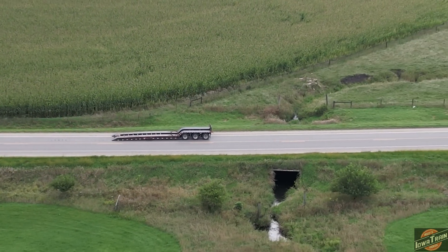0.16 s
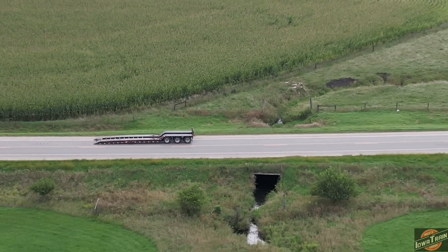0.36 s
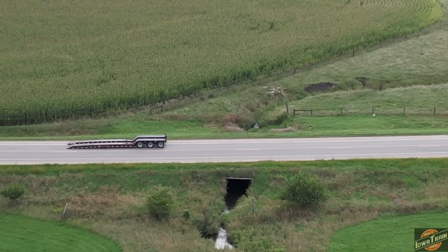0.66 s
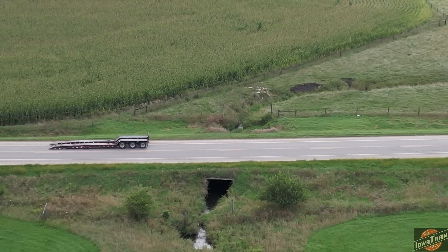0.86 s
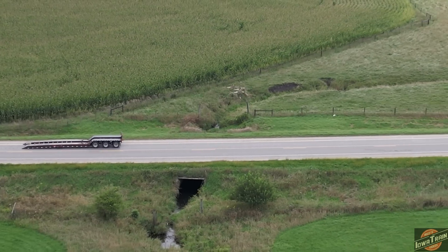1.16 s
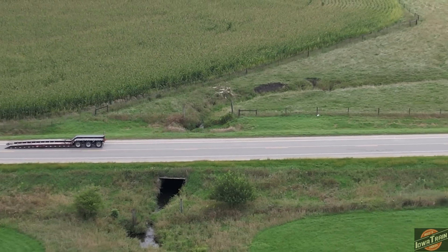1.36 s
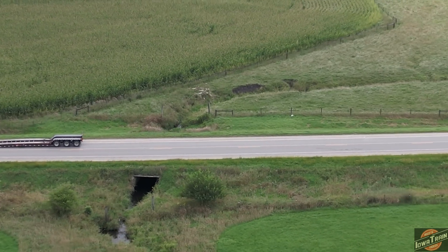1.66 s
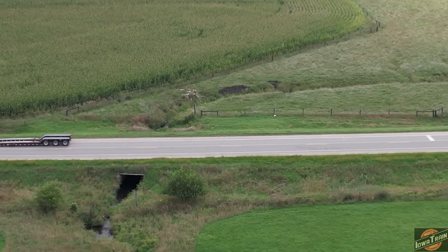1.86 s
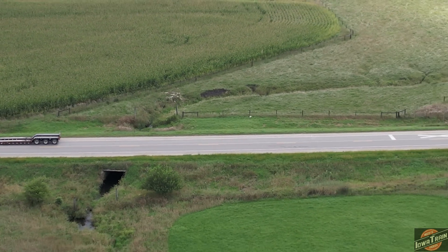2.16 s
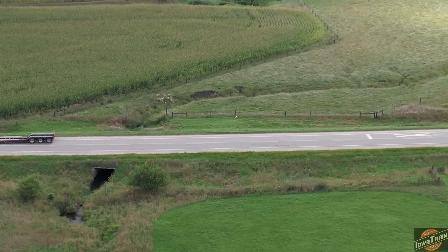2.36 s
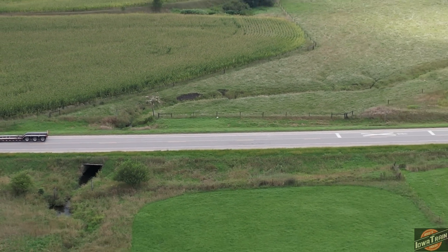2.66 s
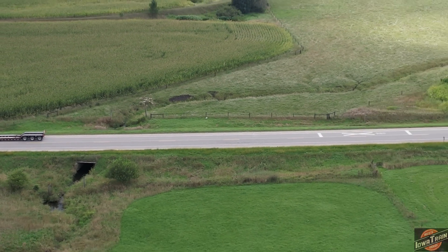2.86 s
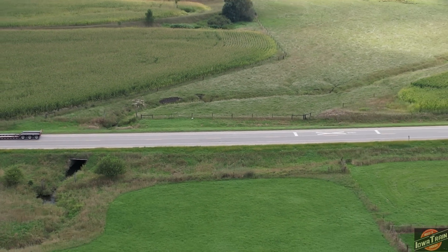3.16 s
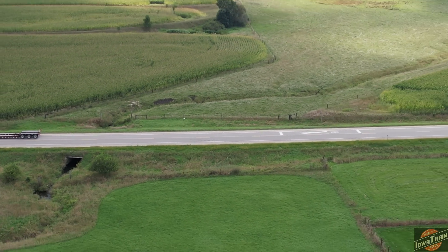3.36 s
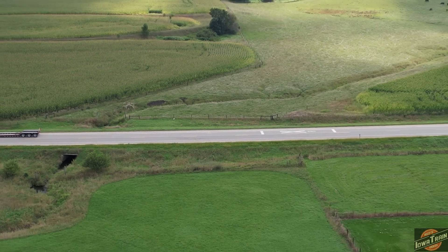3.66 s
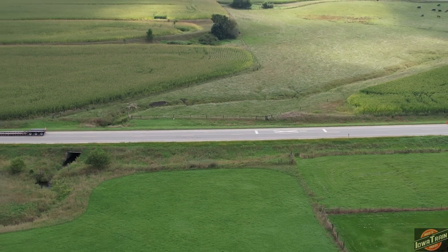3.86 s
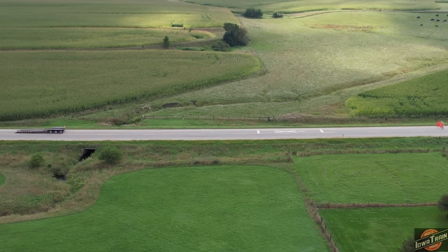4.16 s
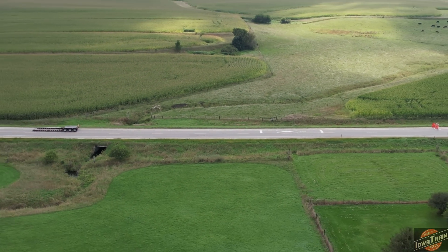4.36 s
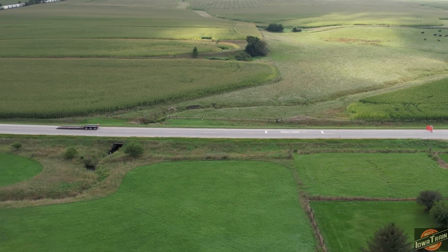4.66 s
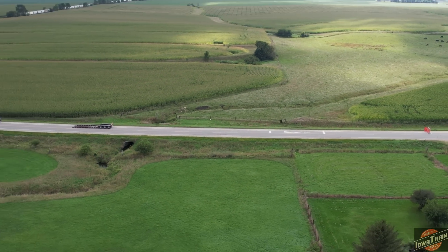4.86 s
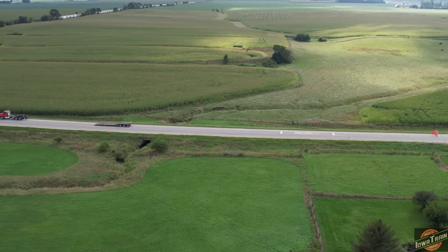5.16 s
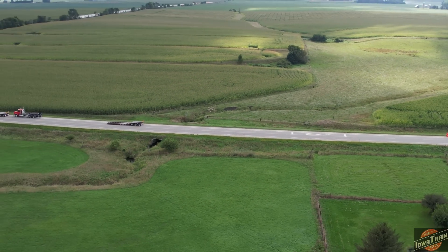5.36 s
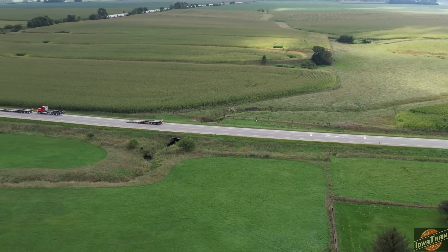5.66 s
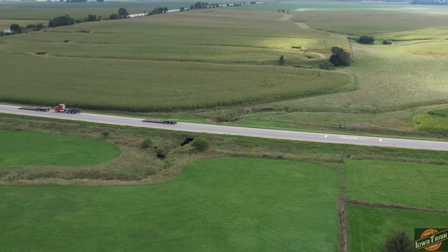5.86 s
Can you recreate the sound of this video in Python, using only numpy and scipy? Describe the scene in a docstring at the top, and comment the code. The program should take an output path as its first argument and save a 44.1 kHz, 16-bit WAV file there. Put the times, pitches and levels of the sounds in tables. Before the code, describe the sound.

Late-summer farmland alive with close cricket chirps and a dense high insect shimmer, low wind buffeting swelling midway, faint traffic roar behind.

```python
"""Field crickets chirp close by in falling strokes over a higher, shimmering crowd of ground crickets, while wind
rumbles and flutters on the microphone and a far road drones on the left: late-summer fields from a hilltop.
The crickets are built stroke by stroke from gliding tones, with scattered echoes and blurs of shaped noise.
Wind is three bands of noise, the road is roar, tyre hiss, a whine and one soft note; a far bird's faint
whistles, a few dry ticks and a bed of air noise fill in the rest."""
import sys
import numpy as np
from scipy import signal
from scipy.io import wavfile
from scipy.ndimage import uniform_filter1d

SR = 44100
rng = np.random.default_rng(int(sys.argv[2]) if len(sys.argv) > 2 else 0)


def wav_record(signal):
    """Record a signal, one row per channel, as 16-bit PCM in the file named by sys.argv[1]."""
    frames = np.transpose(np.atleast_2d(signal))
    bounded = np.clip(frames, -1, 1)
    # unit amplitude maps onto the largest positive 16-bit level
    quanta = np.round(bounded * 32767).astype(np.int16)
    wavfile.write(sys.argv[1], SR, quanta)


N = 265923
T = np.arange(N) / SR

# field cricket stroke: length (s), share of the pitch lost, how late it drops, exponents of rise and fade
STROKE_S, STROKE_FALL, STROKE_BEND, STROKE_RISE, STROKE_FADE = .027, .21, 2.8, 1.7, 2.6
# wing strokes within one field cricket chirp, the first the weakest: (delay t/s, level/dB relative)
CHIRP_STROKES = [(0, -1), (.038, 0.5), (.079, 0.5)]


def amp(db):
    """Decibels to linear gain."""
    return 10 ** (np.asarray(db) / 20)


def evened(x):
    """Scales a signal to an rms of 1."""
    return x / np.sqrt(np.mean(x ** 2) + 1e-20)


def sides(pan_db):
    """Left and right gains for a level difference (left minus right, dB), with their mean kept at 1."""
    left = amp(pan_db) * np.ones(1)
    return np.array([2 * left, 2 + 0 * left]) / (1 + left)


def curves(rows):
    """Straight lines through the breakpoints: one control curve for each column after the time."""
    s, *columns = np.transpose(rows)
    return [np.interp(T, s, column) for column in columns]


def add(mix, s, sound):
    """Mixes a sound in from time s (s), cut off where the mix ends."""
    part = mix[:, round(s * SR):][:, :sound.shape[1]]
    part += sound[:, :part.shape[1]]


def noise(spectrum, same, patchy_db, size=1024):
    """Two channels of random short-time spectra, partly alike, with drifting patches, at an rms of 1."""
    hop, hz = size // 4, np.fft.rfftfreq(size, 1 / SR)
    a, b, c, d, patches = rng.standard_normal((N // hop + 5, len(hz), 5)).T
    patches = uniform_filter1d(patches, size=9, axis=0)
    patches = evened(uniform_filter1d(patches, size=9, axis=1))
    f, db = np.transpose(spectrum)
    colour_db = np.interp(np.log(hz + 1), np.log(f), db, -120, -120)[:, None]
    same, left = np.clip(same, 0, 1), a + 1j * b
    right = same * left + np.sqrt(1 - same ** 2) * (c + 1j * d)
    z = np.array([left, right]) * amp(colour_db + patchy_db * patches)
    return evened(signal.istft(z, nperseg=size, noverlap=size - hop)[1][:, :N])


def stroke(hz, length, fall, bend, rise, fade, phase=0):
    """One wing stroke: a pure tone that holds its pitch, then drops ever faster as the file slows."""
    u = np.arange(0, length, 1 / SR) / length
    shape = u ** rise * (1 - u) ** fade
    glide_hz = hz * (1 - fall * u ** bend)
    tone = np.sin(2 * np.pi * (np.cumsum(glide_hz) / SR + phase))
    return shape / shape.max() * tone


def scattered(x, t60):
    """Echoes from stalks and ground: a dense tail that dies away over t60 (s), different on each side."""
    t = np.arange(SR // 4) / SR
    taps = rng.standard_normal((2, len(t))) * amp(-60 * t / t60)
    return signal.fftconvolve(x, taps / np.linalg.norm(taps[0]), axes=1)[:, :N]


def field_crickets():
    """Near and far singers with their echoes, over a soft blur of the farthest."""
    # colour of the farthest singers' blur: (f/Hz, relative level/dB per Hz)
    blur_colour = [(4100, -38), (4450, -6.5), (4800, 1), (5250, 3), (5550, -11), (5800, -38)]
    near, far = near_field_crickets(), far_field_crickets()
    # the further off, the more of the sound is echo
    echoes = scattered(amp(-14) * near + amp(1.0) * far, 0.053)
    blur = amp(-66) * sides(-3.5) * noise(blur_colour, 0.93, 1.6, size=256)
    return near + far + echoes + blur


def near_field_crickets():
    """Three-stroke chirps, lone strokes between them, and fainter lone strokes at random moments."""
    # three-stroke chirps, before each stroke's own offset: (start t/s, level/dB, top f/Hz, left minus right/dB)
    chirps = [(-.064, -44.5, 5330, -4), (.18, -46.5, 5380, -6), (.257, -43.5, 5340, -3),
              (.531, -47.5, 5430, -3), (.58, -45.5, 5340, -2), (.82, -46.5, 5400, -4),
              (.893, -43.5, 5330, -3), (1.038, -52, 5260, -2), (1.177, -46, 5350, -3),
              (1.193, -44.5, 5330, -3), (1.449, -46.5, 5420, -3.5), (1.524, -43, 5314, -3),
              (1.725, -45.5, 5400, -4), (1.898, -44, 5310, -3.5), (1.994, -47, 5370, -5),
              (2.12, -54.5, 5380, -2), (2.26, -49, 5370, -5), (2.426, -46, 5310, -4),
              (2.543, -48.5, 5330, -6), (2.707, -45.5, 5280, -5), (2.802, -50.5, 5390, -6),
              (3.068, -44.5, 5305, -4.5), (3.342, -49.5, 5390, -6), (3.425, -46, 5270, -5),
              (3.608, -47, 5370, -6), (3.791, -45.5, 5270, -6), (3.872, -52, 5420, -7),
              (4.104, -48.5, 5240, -5), (4.149, -47.5, 5390, -8), (4.409, -46.5, 5360, -6),
              (4.467, -48.5, 5280, -8), (4.701, -56, 5370, -13), (4.768, -50.5, 5290, -11),
              (4.978, -55.5, 5370, -13), (5.158, -48, 5250, -11), (5.267, -52, 5350, -13),
              (5.39, -54.5, 5310, -7), (5.49, -51.5, 5270, -7), (5.557, -49, 5350, -10),
              (5.842, -53, 5380, -11), (5.873, -48, 5310, -9)]
    # lone strokes, before the chance spread: (start t/s, level/dB, top f/Hz, left minus right/dB)
    lone = [(.319, -54, 5460, -4), (.356, -53, 5170, -2), (.364, -49, 5580, 0), (1.636, -50, 5250, -3),
            (1.873, -55, 4950, -3), (2.355, -54, 4960, -5), (2.685, -53, 4980, -7), (3.105, -61, 4330, -2),
            (3.143, -60, 4270, -1), (3.153, -51, 5340, -3), (3.211, -60, 4330, -2), (3.398, -53, 5020, -4),
            (3.656, -67, 4300, -2), (3.692, -63, 4300, -1), (4.062, -61, 4400, -1),
            (4.277, -49.5, 5350, -3), (4.345, -50.5, 5230, -7), (4.38, -53, 5260, -3),
            (4.723, -53, 5190, -8), (4.929, -58, 4780, -8), (5.129, -55, 5180, -6), (5.793, -54, 5320, -4),
            (5.905, -50, 5280, -7)]
    faint_per_s, uneven_db = 12, 0.5  # mean rate of faint strokes (1/s), chance level spread (+/- dB)
    strokes = [(s + delay, db + more_db, hz, pan_db)
               for s, db, hz, pan_db in chirps for delay, more_db in CHIRP_STROKES]
    wait, close, pitch, side = rng.random((130, 4)).T
    faint_starts = np.cumsum(2 * wait / faint_per_s)
    faint = zip(faint_starts, -60.5 + 2.5 * close, 4790 + (5664 - 4790) * pitch, -9 + 8 * side)
    # strokes that would start before time zero are left out
    strokes = [row for row in strokes + lone + list(faint) if row[0] >= 0]

    near = np.zeros((2, N))
    chances = rng.random((len(strokes), 4))
    for (s, db, hz, pan_db), (phase, stretch, uneven, slide) in zip(strokes, chances):
        # no two strokes last quite as long or slide as far
        length = STROKE_S * (.92 + .16 * stretch)
        fall = STROKE_FALL * (0.677 + 0.39 * slide)
        one = stroke(hz, length, fall, STROKE_BEND, STROKE_RISE, STROKE_FADE, phase)
        level = amp(db + uneven_db * (2 * uneven - 1.5))  # the spread sits slightly below the table level
        add(near, s, level * sides(pan_db) * one)
    return near


def far_field_crickets():
    """Quiet chirps of three equal strokes at random moments, each chirp with its own pitch, level and side."""
    chirps_per_s, faintest_db = 40, -72  # mean rate (1/s), stroke peak of the most distant (dB)
    far = np.zeros((2, N))
    draws = rng.random((400, 4))
    starts = np.cumsum(2 * draws[:, 0] / chirps_per_s)
    for s, (_, pitch, close, side) in zip(starts, draws):
        one = stroke(4750 + 850 * pitch, STROKE_S, STROKE_FALL, STROKE_BEND, STROKE_RISE, STROKE_FADE)
        one *= amp(faintest_db + 9 * close)
        for delay, _ in CHIRP_STROKES:
            add(far, s + delay, sides(-11 + 10 * side) * one)
    return far


def ground_crickets():
    """Many trills spread over the band, higher singers stroking faster, over the blur of those far away."""
    # colour of the whole crowd: (f/Hz, relative level/dB per Hz)
    crowd_colour = [(3650, -89), (6200, -30.5), (6950, -22), (7620, -6), (8010, 3), (8510, 8), (9100, 0),
                    (9370, -23), (9850, -26), (10200, -30), (13300, -90), (22000, -120)]
    # the crowd shifts from side to side, level before a 1 dB lift: (t/s, level/dB, left minus right/dB)
    crowd_moves = [(0.0, -48.5, -5.5), (1.39, -48.5, -5.5), (2.57, -49, -5), (3.43, -48, -5),
                   (6.03, -48.5, -7)]
    # singers that stand out: (top f/Hz, strokes per second/Hz, first stroke t/s, mean peak level/dB,
    # left minus right/dB)
    trillers = [(6980, 13.81, .008, -70, -8), (7700, 16.3, .02, -62, -8), (8600, 18.0, .02, -54, -4),
                (9100, 19.6, .03, -56, -5)]
    f, db = np.transpose(crowd_colour)
    pitches = np.linspace(7500, 9500, num=60)
    crowd = np.zeros((2, N))
    for hz, (pace, first, side) in zip(pitches, rng.random((len(pitches), 3))):
        per_s = hz / 480 * (.9 + .2 * pace)
        singer_db = np.interp(hz * 0.988, f, db)  # read a little below the top pitch
        crowd += trill(hz, per_s, first / 18, singer_db, 8 * side - 4)
    blur = noise(crowd_colour, 0.6, 1.0, size=256)
    level_db, pan_db = curves(crowd_moves)
    both = evened(amp(-1) * evened(crowd) + blur) * amp(level_db + 1.0) * sides(pan_db)
    near = sum(trill(*row) for row in trillers)
    return both + near + amp(-4) * scattered(near, .06)


def trill(hz, per_s, first, db, pan_db):
    """A steady train of strokes whose timing drifts slightly; the two microphone ports hear it out of step."""
    out, draws = np.zeros((2, N)), rng.standard_normal((150, 2))
    lag = rng.normal(0, .16)  # cycles, ahead on one side and behind on the other
    one = np.array([stroke(hz, .026, .1, 2.2, 1.2, 1.8, phase) for phase in (lag, -lag)]) * sides(pan_db)
    starts = first + np.arange(150) / per_s + .0004 * np.cumsum(draws[:, 0])
    for s, wobble in zip(starts, draws[:, 1]):
        add(out, max(s, 0), amp(db + 2.6 * wobble) * one)
    return out


def wind():
    """Lumpy low pressure swings, nearly alike at both ports, a faster flutter that moves sideways, a rush."""
    # gusts before the buffets: (t/s, rumble level/dB, flutter level/dB, rush level/dB,
    # flutter left minus right/dB)
    gusts = [(0.0, -46.5, -50.5, -58.5, 3), (0.28, -44.5, -45, -52.5, -5.5), (0.37, -51, -50, -56, -6.5),
             (0.7, -48, -51.5, -62, -1.5), (1.23, -49.5, -54, -58.5, -14), (1.63, -54, -57.5, -60, -4),
             (2.23, -48, -54.5, -60.5, 5), (2.43, -37, -39, -66, 1.5), (2.52, -41.5, -46, -57.5, -3.5),
             (2.94, -38.5, -39, -57, -5.0), (3.27, -43, -46.5, -56.5, -8.5), (3.32, -45, -46, -58.5, -7.5),
             (4.47, -40, -43, -53.5, -5), (4.75, -41.5, -56.5, -58.5, 4.5), (4.82, -43.5, -49, -57.5, 10),
             (5.24, -45.5, -64.5, -64, 12), (5.32, -43, -44, -61, 5), (5.46, -50, -62, -59.5, 2),
             (5.95, -54.5, -62.5, -66.5, -2), (6.03, -46.5, -63, -61, 0.0)]
    # colours of the three layers: (f/Hz, relative level/dB per Hz)
    rumble_colour = [(12, -29), (25, -10.5), (60, -0.5), (100, -3.5), (140, -20.5), (300, -33.5)]
    flutter_colour = [(60, -56), (110, -0.5), (175, -4.5), (230, -14), (290, -18.5), (500, -59)]
    rush_colour = [(180, -34), (260, 1), (330, -2.5), (440, -5), (520, -21.5), (900, -60)]
    rumble_db, flutter_db, rush_db, pan_db = curves(gusts)
    rumble_lift_db, flutter_lift_db = buffet_lifts()
    buffeting = lumps()
    rumble = levelled(noise(rumble_colour, .997, .6, size=2048), size=2000) * buffeting
    flutter = levelled(noise(flutter_colour, .98, 1.6), size=2000)
    flutter = flutter * np.sqrt(buffeting * lumps())  # half in step with the rumble
    # the rush takes a share of the flutter's lift
    rush = noise(rush_colour, 0.89, 3.1) * amp(rush_db + 0.65 * flutter_lift_db)
    # the rumble leans left and follows a share of the flutter's side to side
    rumble_sides = sides(2 + .25 * pan_db)
    return (rumble * amp(rumble_db + rumble_lift_db) * rumble_sides
            + flutter * amp(flutter_db + flutter_lift_db) * sides(pan_db) + rush)


def buffet_lifts():
    """Brief bell-shaped level changes of rumble and flutter (dB) for the hardest single buffets."""
    # single buffets: (centre t/s, rumble lift level/dB, flutter lift level/dB)
    hard_buffets = [(.27, 0, 1.5), (2.421, 7, 4.5), (2.59, 7, 2), (2.66, 6.5, 6), (2.771, 4.5, 8),
                    (2.968, 5.5, 5), (3.09, 4.5, -4), (3.34, 7.5, 1.5), (3.48, 3.5, -2), (3.61, 8, 4),
                    (3.83, 4, 7), (4.11, 10, 10), (4.26, 5, 7.5), (4.47, 2, 1.5), (4.6, 5, 1),
                    (4.75, 4, -5), (5.07, 2, 3), (5.39, 2, 5.5)]
    half_width_s = .025
    return sum(np.exp(-((T - s) / half_width_s) ** 2) * np.array(lifts)[:, None]
               for s, *lifts in hard_buffets)


def levelled(x, size):
    """Divides out the slow chance swells of a noise, so that its level follows the control curves."""
    power = uniform_filter1d((x ** 2).mean(0), size)
    return x / np.sqrt(abs(uniform_filter1d(power, size)) + 1e-3)


def lumps():
    """Lesser buffeting: a gain of mean power 1 that wanders at random, as a sum of slow sines."""
    depth_db, top_hz = 2.0, 9  # rms depth (dB), fastest wander (Hz)
    rates, phases = np.geomspace(top_hz / 4, top_hz, num=24), rng.random(24)
    wander = np.sin(2 * np.pi * (rates[:, None] * T + phases[:, None])).sum(0)
    return evened(amp(depth_db * evened(wander)))


def road():
    """Far traffic: a roar and, above it, tyre hiss that drift apart; a thin steady whine, and one soft note."""
    # colour of the traffic: (f/Hz, relative level/dB per Hz)
    road_colour = [(280, -27), (480, -9), (565, -11), (636, -2), (672, -4), (742, -5), (820, -3),
                   (1100, -14.5), (1290, -13), (1400, -15), (2090, -19.5), (2290, -20.5), (3910, -29.5),
                   (4200, -33), (5460, -58), (9240, -120)]
    # traffic moves, hiss before a 1.3 dB lift: (t/s, roar level/dB, hiss level/dB, left minus right/dB)
    traffic = [(0.0, -55.5, -70.5, 6.5), (1.2, -57, -69, 5), (3.68, -56.5, -68, 3.0),
               (4.68, -60.5, -67.5, 4), (6.03, -58.5, -67, 4)]
    # gliding whine: (t/s, f/Hz, rms level/dB)
    whine_glide = [(0, 718, -77), (3.3, 692, -69), (3.7, 713, -72), (4.8, 677.3, -65), (6.03, 671, -66.5)]
    # one soft low note: (start t/s, length t/s, f/Hz, peak level/dB)
    soft_note = (1.13, .09, 660, -51)
    roar_db, hiss_db, pan_db = curves(traffic)
    low, high = (signal.butter(2, 1150, kind, fs=SR, output="sos") for kind in ("low", "high"))
    roar = evened(signal.sosfiltfilt(low, noise(road_colour, .975, .9)))
    hiss = evened(signal.sosfiltfilt(high, noise(road_colour, 0.89, 1.0)))
    hz, db = curves(whine_glide)
    whine = amp(db) * np.sqrt(2) * np.sin(2 * np.pi * np.cumsum(hz) / SR)
    out = (roar * amp(roar_db) + hiss * amp(hiss_db + 1.3) + whine) * sides(pan_db)
    s, length, note_hz, note_db = soft_note
    add(out, s, amp(note_db) * sides(3.4) * stroke(note_hz, length, .01, 1.2, 0.4, 0.52))
    return out


def bird_whistles():
    """Faint whistles of a far bird: short pure tones that slide down by a third."""
    # whistles: (start t/s, peak level/dB, top f/Hz, left minus right/dB)
    whistles = [(1.655, -73, 3900, 3), (3.125, -73, 3450, 3), (3.272, -72, 3500, 3), (3.392, -74, 3300, 3)]
    out = np.zeros((2, N))
    for s, db, hz, pan_db in whistles:
        add(out, s, amp(db) * sides(pan_db) * stroke(hz, 0.049, 0.33, 1.6, 0.62, 0.75))
    return out


def dry_ticks():
    """Small dry ticks close by: two damped rings with an even shorter click at the start."""
    # ticks: (t/s, level/dB of the first ring, first ring f/Hz, second ring f/Hz)
    ticks = [(.084, -49, 4000, 8300), (0.166, -62, 3100, 2630), (.428, -49.5, 3300, 1920),
             (1.54, -55, 2800, 1830)]
    out, t = np.zeros((2, N)), np.arange(600) / SR
    click = 0.6 * amp(-60 * t / 0.0027) * np.sin(2 * np.pi * 2900 * t)
    for s, db, hz, second_hz in ticks:
        ring = np.sin(2 * np.pi * hz * t) + 1.1 * np.sin(2 * np.pi * second_hz * t)
        add(out, s, sides(4) * amp(db) * (amp(-60 * t / 0.0097) * ring + click))
    return out


def air():
    """A faint steady bed of high noise, nearly alike on both sides."""
    # colour of the air: (f/Hz, relative level/dB per Hz)
    air_colour = [(3000, -2), (6000, -3), (9500, -6), (10400, -14), (11000, -12), (11600, -2), (15500, 0),
                  (18000, 0)]
    return amp(-68.5) * noise(air_colour, .998, 1.1, size=256)


def scene():
    """All the layers together."""
    return (field_crickets() + ground_crickets() + wind() + road()
            + bird_whistles() + dry_ticks() + air())


def record(dry):
    """The band limit of the recorder: a steep low-pass without phase shift."""
    edge_hz = 15760
    low_pass = signal.firwin(2047, edge_hz, window=("kaiser", 10), fs=SR)
    return signal.oaconvolve(dry, low_pass[None], "same")


dry = scene()
out = record(dry)
wav_record(out)
```